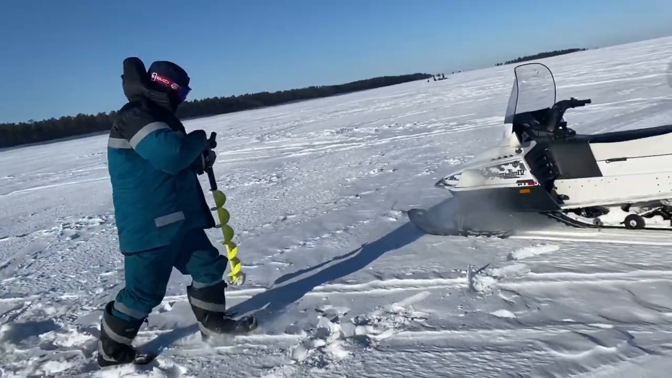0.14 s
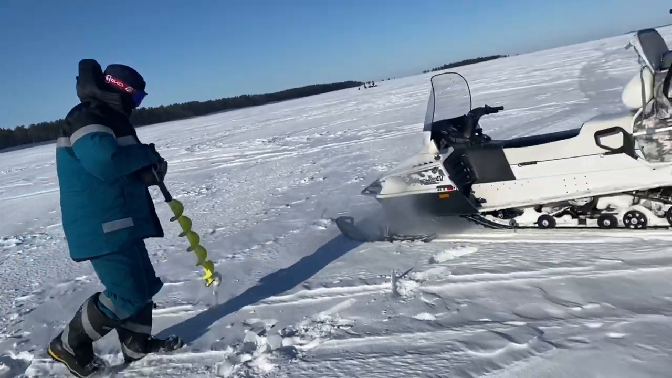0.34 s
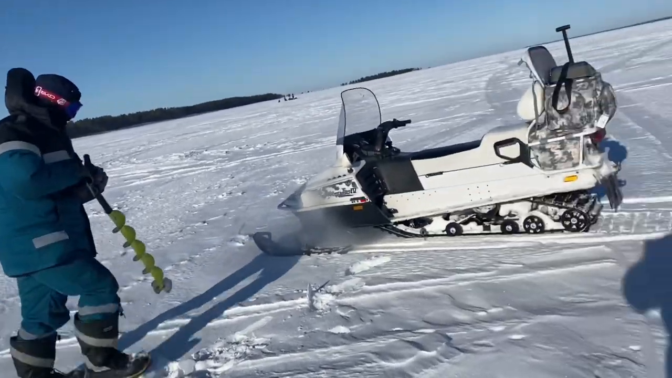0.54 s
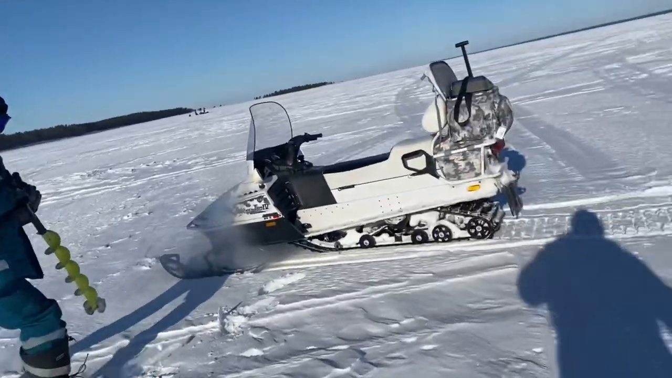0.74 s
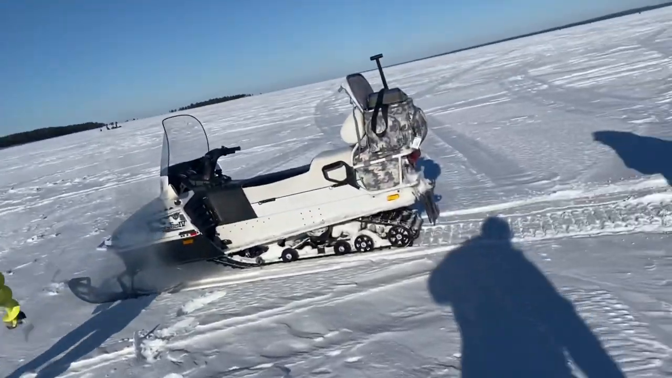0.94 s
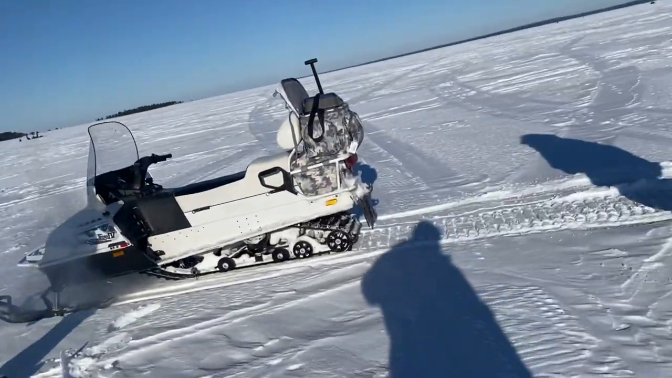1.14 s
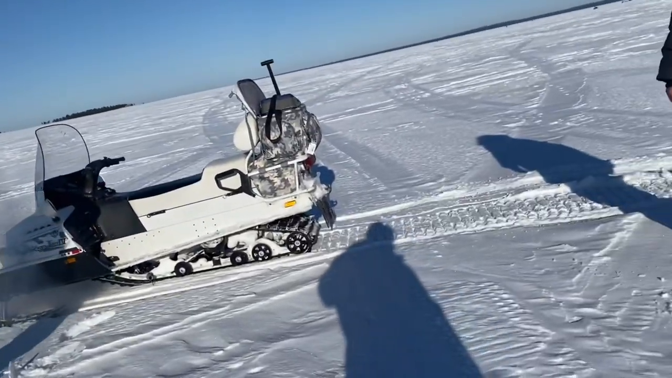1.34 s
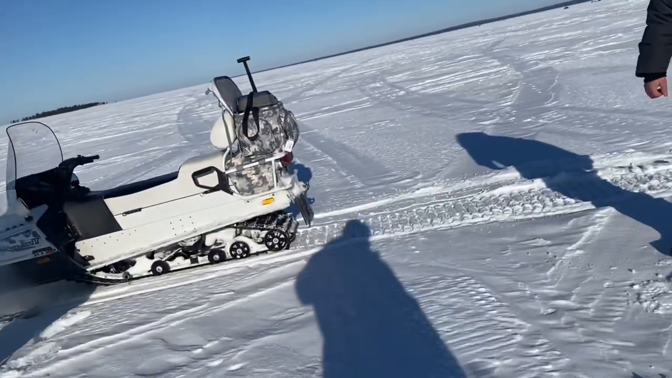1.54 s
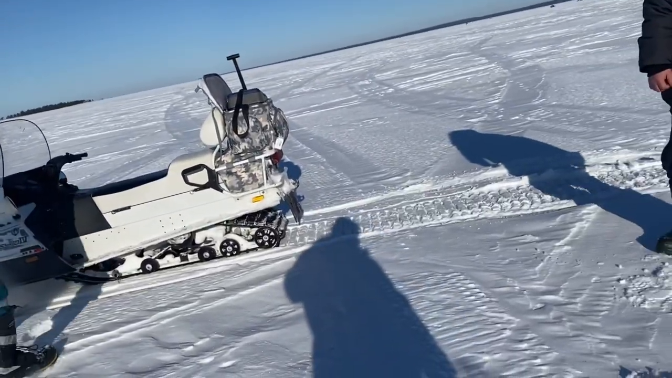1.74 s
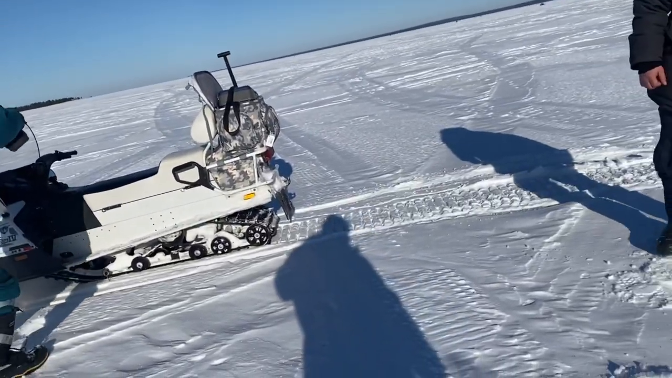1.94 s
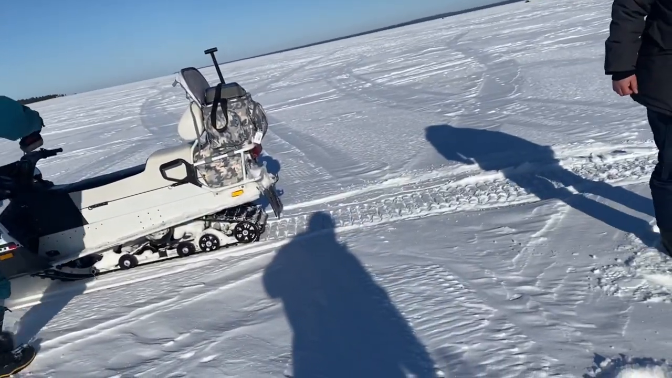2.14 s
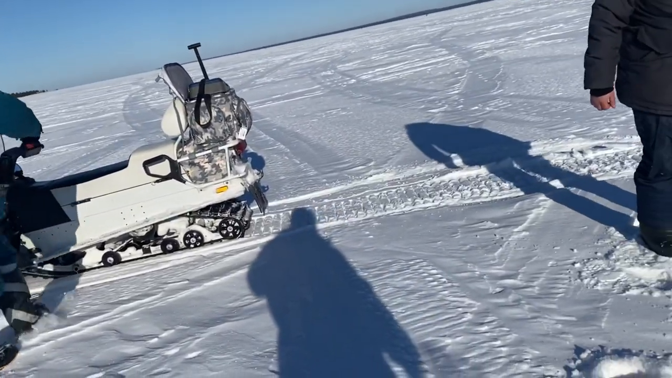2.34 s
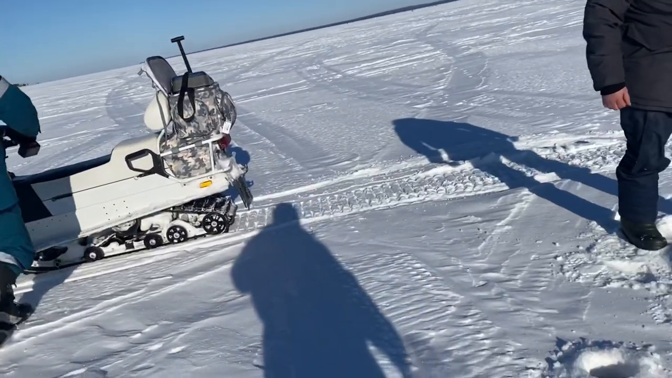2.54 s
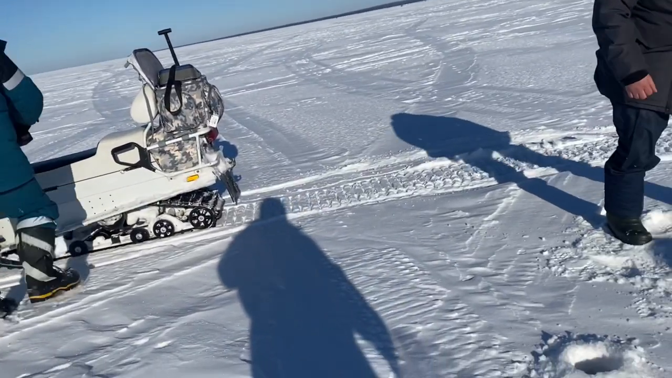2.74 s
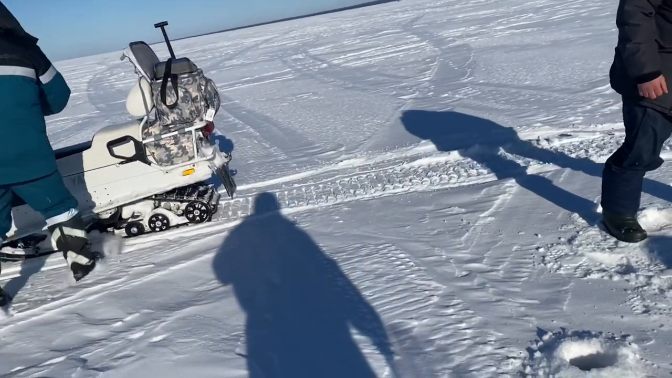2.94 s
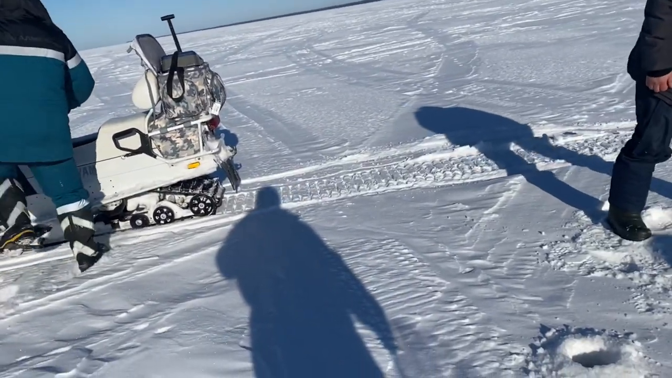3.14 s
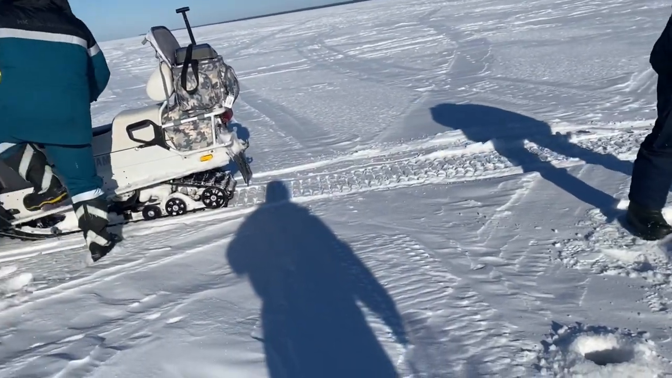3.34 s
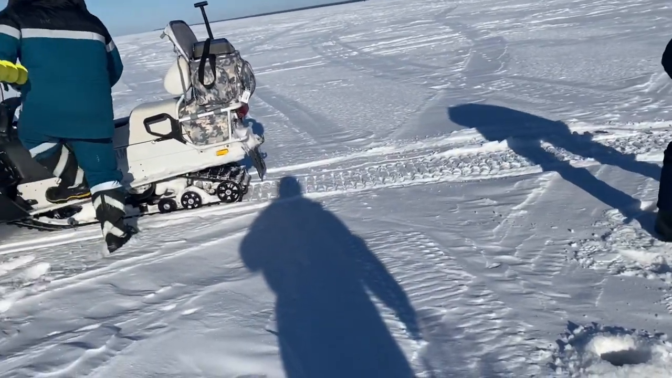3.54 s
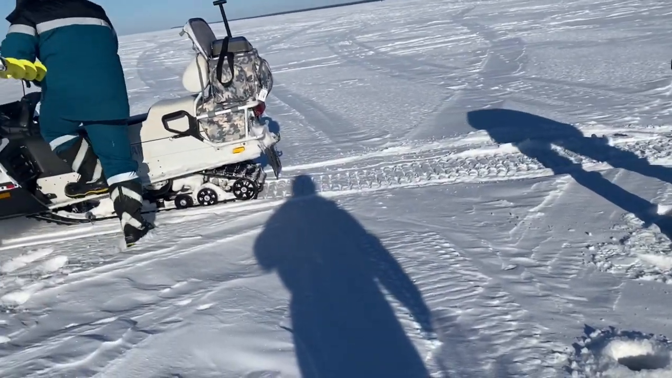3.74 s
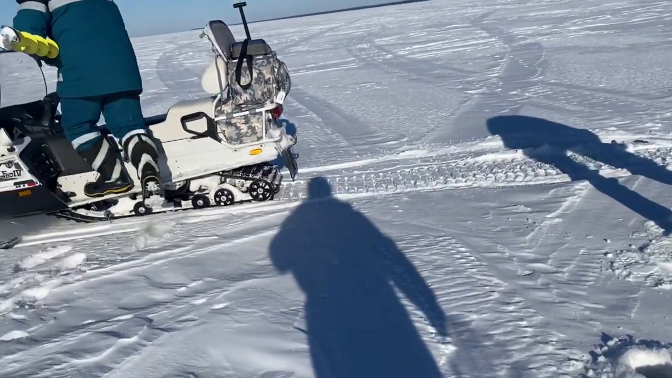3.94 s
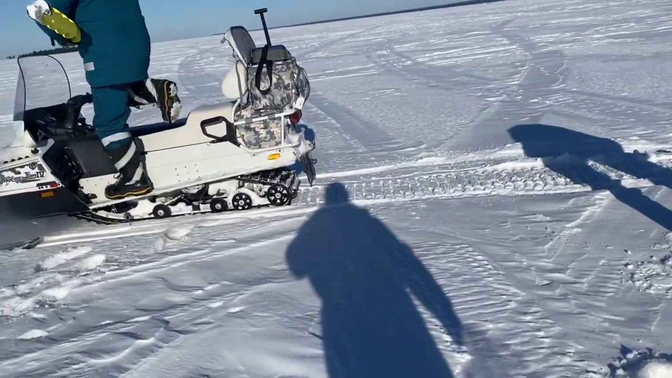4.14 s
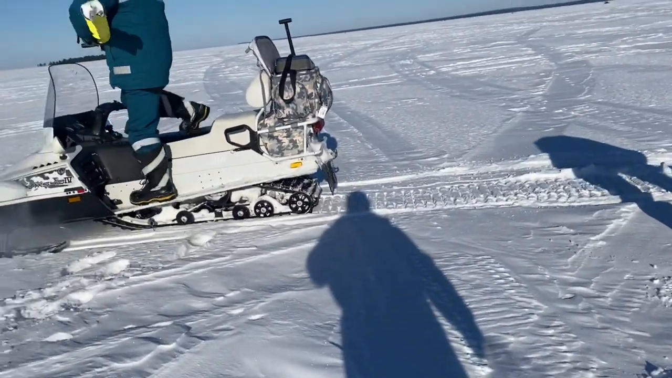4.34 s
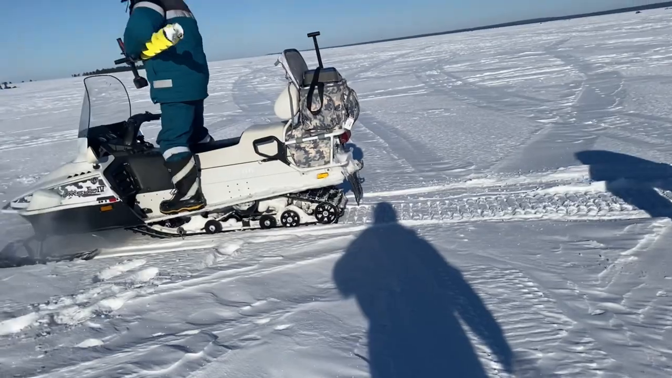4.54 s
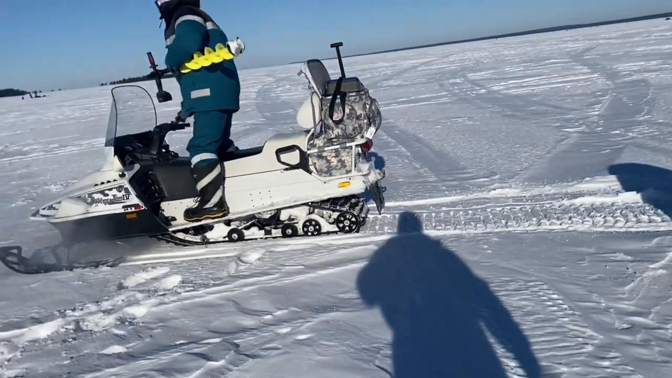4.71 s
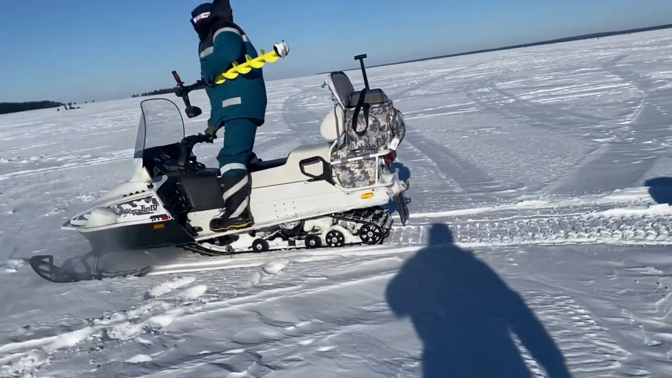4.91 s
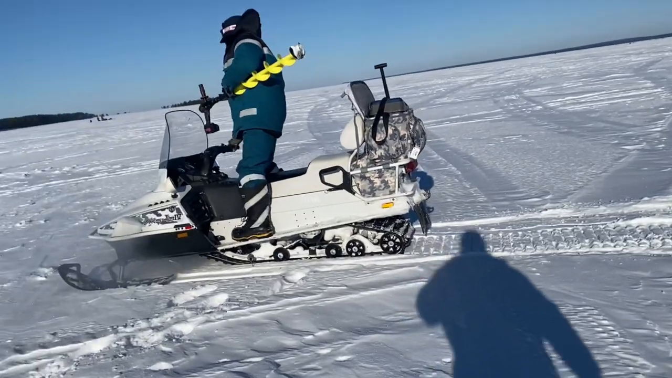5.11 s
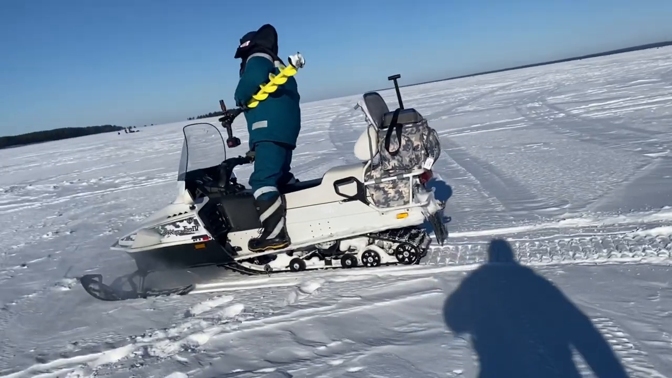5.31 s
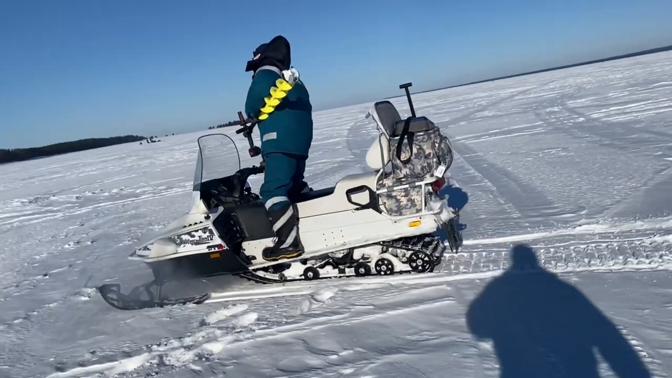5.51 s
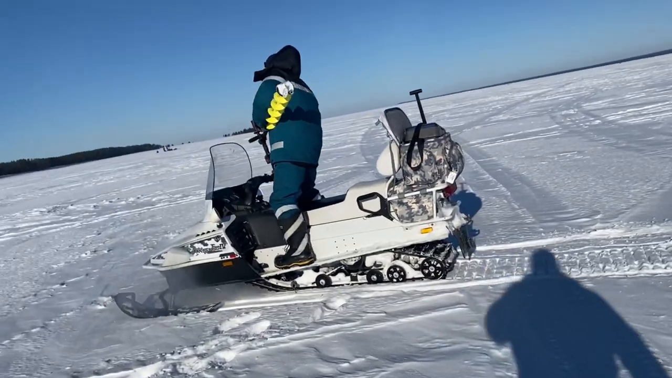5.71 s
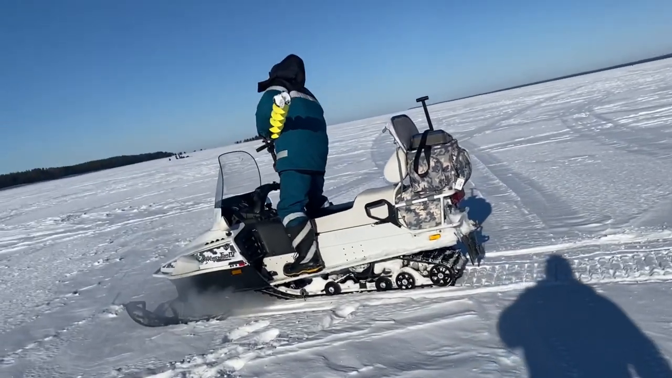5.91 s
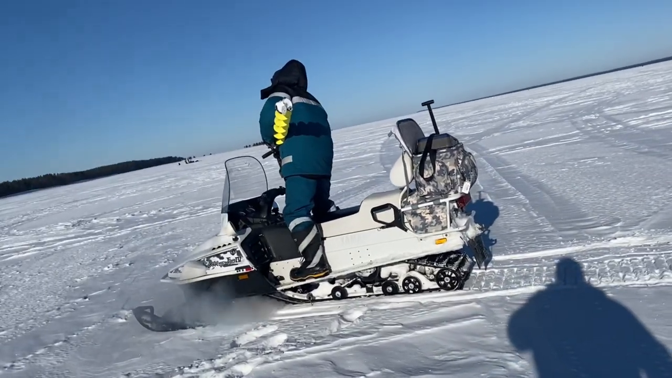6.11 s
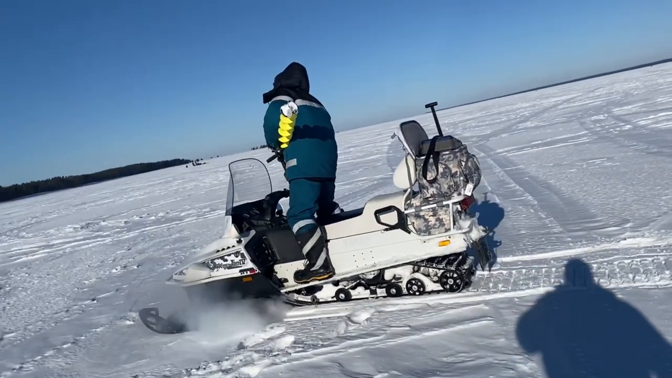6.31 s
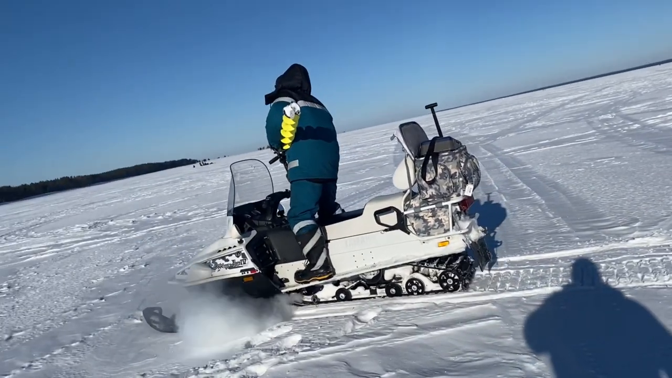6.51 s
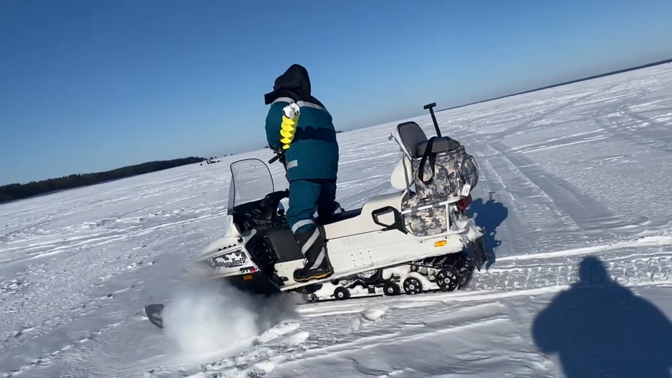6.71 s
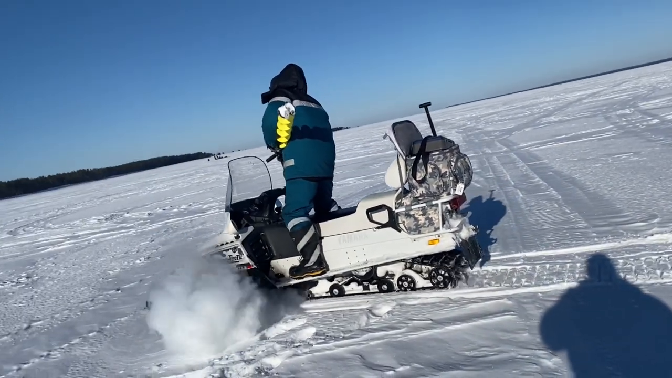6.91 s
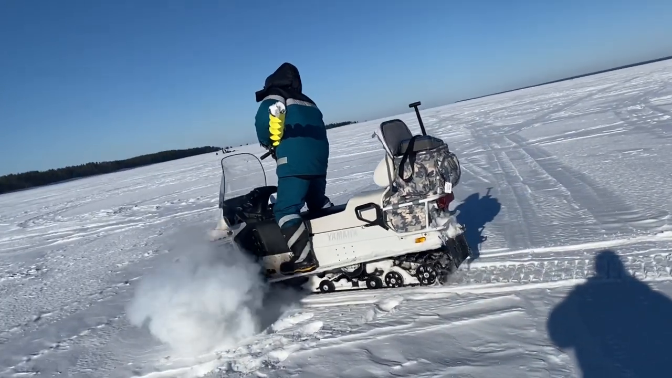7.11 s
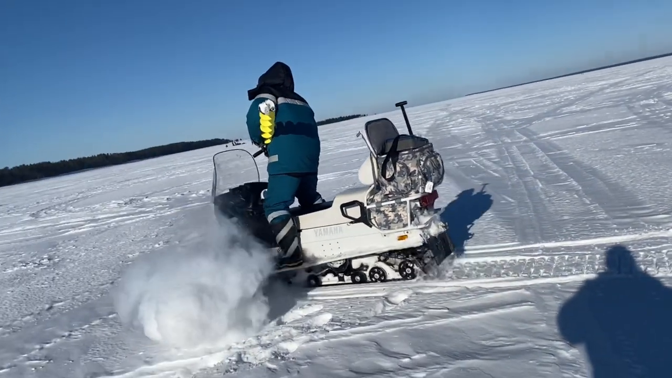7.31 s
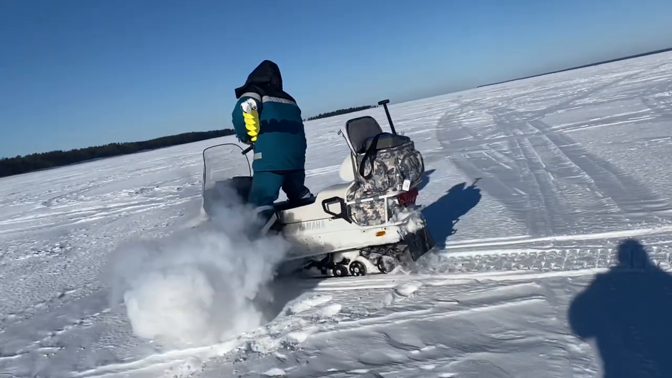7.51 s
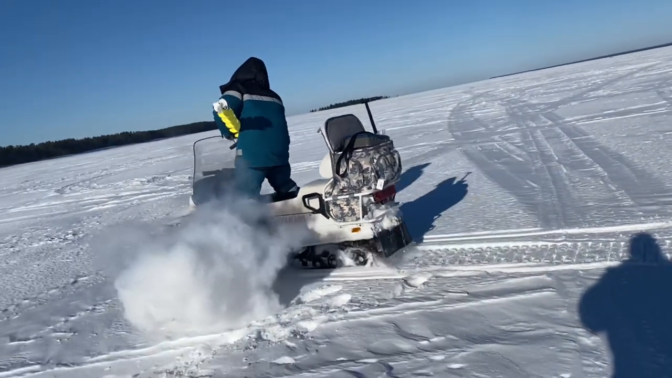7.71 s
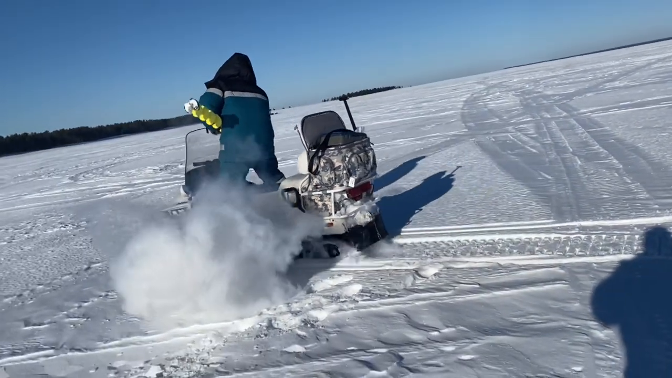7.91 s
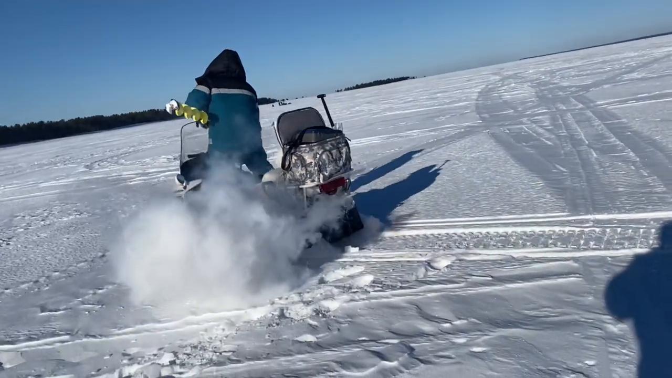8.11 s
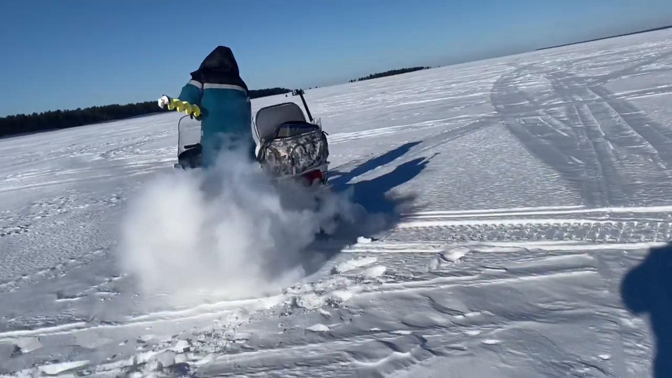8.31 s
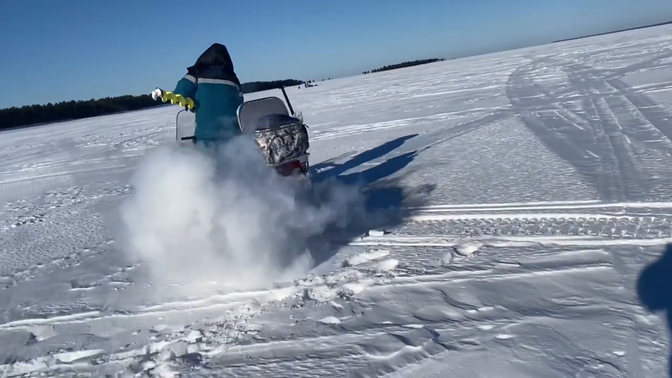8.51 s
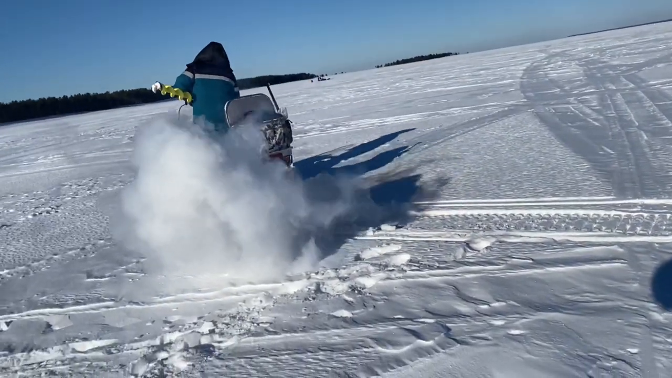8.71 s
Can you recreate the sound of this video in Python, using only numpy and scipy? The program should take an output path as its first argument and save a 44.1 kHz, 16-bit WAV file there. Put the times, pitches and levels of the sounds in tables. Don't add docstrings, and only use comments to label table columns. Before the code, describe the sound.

A two-stroke snowmobile idles close by on open snow, soft deep pops about six a second with light metal rattle and hiss. Faint boots crunch, then a cluster of dull knocks as the rider climbs aboard. Just after five seconds the throttle opens: pops merge into a loud raspy drone with hard barks, and the machine starts off with a hollow track clatter. Hand-held stereo microphone a few metres away, dry, no walls.

```python
import sys
import numpy as np
from scipy import signal
from scipy.fft import rfft, irfft, next_fast_len
from scipy.io import wavfile
from scipy.ndimage import uniform_filter1d, minimum_filter1d

SR = 44100
rng = np.random.default_rng(int(sys.argv[2]) if len(sys.argv) > 2 else 0)


def master_out(mix):
    frames = np.transpose(np.atleast_2d(mix))
    ceiling = np.clip(frames, -1, 1)
    pcm = np.round(ceiling * 32767).astype(np.int16)
    wavfile.write(sys.argv[1], SR, pcm)


def magnitude_from_level(level_db):
    exponent = np.asarray(level_db, float) / 20
    return 10 ** exponent


N = 385875

# start_s, crack_db, thump_db, hiss_puff_db
IDLE_FIRINGS = [(0.113, -14.5, -16.5, -44.5), (0.32, -16, -18, -46.5), (0.477, -16, -16.5, -41.5),
                (0.632, -17.5, -16.5, -42.5), (0.798, -14, -17.5, -43.5), (0.952, -14, -17.5, -44.5),
                (1.06, -16, -18, -44), (1.225, -17, -18, -47), (1.392, -19.5, -17.5, -46),
                (1.547, -22.5, -16, -41.5), (1.704, -20.5, -16, -46.5), (1.861, -21, -16, -44.5),
                (2.019, -18.5, -17, -44.5), (2.226, -19, -18.5, -44.5), (2.377, -18.5, -17.5, -49),
                (2.482, -19.5, -18, -55), (2.591, -21, -17.5, -50.5), (2.705, -18.5, -16.5, -49),
                (2.874, -19, -18.5, -52), (3.036, -18, -16.5, -45), (3.243, -19.5, -18, -47),
                (3.403, -16.5, -16.5, -46), (3.56, -15.5, -15.5, -45), (3.717, -16.5, -16, -43),
                (3.874, -15.5, -16.5, -43), (4.032, -15.5, -17, -42.5), (4.187, -15.5, -16, -42.5),
                (4.343, -16, -16.5, -43), (4.5, -17, -16.5, -43), (4.655, -15.5, -18.5, -45),
                (4.765, -16, -17, -43), (4.874, -18.5, -20.5, -48), (4.986, -16.5, -18.5, -43.5),
                (5.205, -17, -17, -41)]
# start_s, level_db, sharpness (0-1)
STUMBLES = [
    (0.265, -34, 0.65),
    (1.167, -31, 0.27),
    (1.318, -21, 0),
    (2.814, -43, 0.9),
    (3.188, -24, 0.2),
    (4.523, -24.5, 0.29),
    (4.852, -38.5, 1),
    (5.251, -20, 0.15),
    (5.293, -25, 0.4),
    (5.325, -34, 0.2),
]
# start_s, thump_db, hiss_puff_db
BEATS = [(5.347, -9, -39), (5.381, -9.2, -42), (5.408, -7.5, -39), (5.434, -7.0, -41),
         (5.482, -7.5, -44), (5.506, -9.6, -35), (5.528, -4.5, -43), (5.553, -15, -35.9),
         (5.581, -11, -35), (5.647, -11, -32.5), (5.707, -5, -38), (5.73, -13, -34),
         (5.777, -7.5, -32), (5.8, -5, -32), (5.845, -9.8, -42), (5.889, -6, -39),
         (5.92, -10.6, -32), (5.952, -14, -44), (6.003, -13, -37), (6.053, -9, -36),
         (6.101, -13, -49), (6.14, -15, -51), (6.179, -6.5, -40), (6.236, -8, -35),
         (6.293, -8, -42), (6.342, -10.7, -37), (6.389, -9.4, -35), (6.428, -7, -39),
         (6.467, -12, -33), (6.497, -6, -43), (6.546, -5.5, -40), (6.597, -9, -45),
         (6.646, -2.5, -40), (6.705, -13, -34), (6.736, -12.1, -33), (6.764, -6, -38),
         (6.803, -8, -43), (6.862, -13, -32), (6.911, -8, -37), (6.959, -7.4, -32.3),
         (7.015, -6, -29), (7.07, -7, -32.9), (7.12, -19, -35.4), (7.144, -8, -31),
                (7.171, -18, -35), (7.208, -15.2, -32), (7.23, -14.4, -40), (7.254, -7, -29),
                (7.281, -13, -40), (7.337, -10.5, -32.1), (7.396, -12, -40), (7.42, -10.6, -31.3),
                (7.497, -8, -37), (7.54, -9, -31), (7.585, -13, -31), (7.639, -10, -33.2),
                (7.688, -12, -31.5), (7.715, -10, -32), (7.757, -10, -37), (7.811, -11.5, -32),
                (7.855, -12.9, -29.5), (7.889, -19, -32), (7.916, -15, -31), (7.99, -19, -32),
                (8.02, -11, -34), (8.064, -12.5, -31), (8.09, -10, -37), (8.137, -17, -38),
                (8.176, -14, -36), (8.211, -14, -36), (8.237, -15.2, -35.6), (8.309, -21, -32),
                (8.339, -17, -31), (8.46, -11, -32.5), (8.519, -19, -31.5), (8.562, -8.5, -29.5),
                (8.6, -11, -31), (8.654, -15, -42), (8.69, -17, -31.5), (8.721, -10.5, -39)]
# time_s, speed_turns_per_s
CRANK_SPEED = [(5.2, 20.1), (5.24, 22.6), (5.41, 36.5), (5.5, 43.4), (5.59, 45.1), (5.75, 42.8),
               (5.96, 48.2), (6.09, 51.7), (6.27, 52.3), (6.62, 50.1), (6.94, 51.9), (7.08, 54.4),
               (7.53, 54.3), (7.85, 56.3), (8.11, 57.8), (8.63, 58.8), (8.75, 56.5)]
# time_s, loudness_db, brightness_db
ENGINE = [(0, -35, -16), (.55, -35, -15), (.9, -34.5, -22), (1.6, -36.5, -20), (2.3, -39, -7.5),
          (2.7, -42.5, -13), (3.0, -39, -17), (3.75, -36.5, -15), (4.8, -34.5, -18), (5.15, -33.5, -30),
          (5.35, -28, -4.5), (5.55, -25.5, -6.5), (5.75, -28.5, -13), (6.05, -26, -0.5), (6.9, -24.5, -5),
          (7.75, -26, -6), (8.3, -27.5, -8.5), (8.75, -30.5, -11)]
# time_s, share of port openings that burn (0-1), burn_db, pumping_db
LOAD = [(0, 0.39, -40, -17), (4.7, 0.35, -34, -18), (5.25, 0.13, -40, -20), (5.4, 0.15, -33, -12.5),
        (5.9, 0.56, -22, -8.5), (6.15, 1, -27, -2), (6.5, 0.28, -50, -13.5), (6.9, 0.52, -35, -5.5),
        (7.2, 0.08, -16, -20.5), (7.5, 0.04, 5, -18), (8.0, 0.16, 15, -18), (8.75, 0.25, -19, -14.5)]
# start_s, strength of the dip (before smoothing)
LULLS = [
    (0.2, 0.95),
    (0.4, 1.0),
    (2.64, 0.6),
    (2.73, 0.99),
    (2.93, 0.88),
    (3.09, 0.9),
    (4.9, 1.1),
    (5.05, 0.96),
    (5.13, 1.0),
]
# pitch_hz, width_hz, level_db
SILENCER = [(102.8, 69.3, 2), (47, 74, -1.5), (212, 118, -10.5)]
# pitch_hz, width_hz, level_db
CHAMBER = [(78.8, 68.5, -18), (364, 90, -48)]
# pitch_hz, width_hz, level_db
TAILPIPE = [(382, 69, -16), (302, 62, -26), (457, 60, -27)]
# pitch_hz, width_hz, level_db
COWL = [(563, 50, -12), (858, 250, 5), (1230, 388, 9.5), (1526, 510, 0), (310, 203, 6)]
# pitch_hz, width_hz, level_db
FINS = [(2120, 182, 2.5), (2736, 315, 4), (3480, 550, -1.5), (1674, 383, 5)]
# pitch_hz, width_hz, level_db
CLUTCH_COVER = [(1434, 220, 6.5), (1990, 127, -1), (810, 190, -13), (2900, 470, -4.5)]
# pitch_hz, level_db (per Hz)
HISS = [(2060, -86), (3500, -1), (5860, -3), (6960, -2.5), (8860, 0.5), (10700, -4), (13500, -9),
        (16000, -5.5)]
# start_s, level_db
STEPS = [
    (0.28, -82),
    (0.55, -68),
    (1.18, -47),
    (1.68, -42),
    (2.2, -45.5),
    (2.8, -46),
    (3.5, -50),
    (4.28, -53),
]
# start_s, peak_db
SPITS = [(0.4589, -41), (0.5561, -35), (1.1498, -33), (1.8038, -36), (2.3176, -31.5), (2.7995, -42),
         (3.019, -44), (3.1857, -36), (3.6641, -31), (3.9729, -39), (4.3191, -29), (4.6389, -42),
         (4.8424, -34)]
# start_s, peak_db, pitch_hz, bright_db
KNOCKS = [(0.302, -24, 1260, -33), (0.406, -36, 584, -38), (0.782, -23, 1240, -34), (0.955, -37, 457, -32),
          (1.378, -26.5, 1240, -25), (1.763, -26, 1180, -33), (2.21, -27.5, 1250, -23),
          (2.862, -33, 557, -23), (2.992, -53, 1160, -24), (3.357, -39, 600, -40), (3.505, -17, 466, -33),
          (3.545, -24, 646, -26), (3.633, -20.5, 630, -30), (3.705, -18.5, 666, -27),
          (3.744, -22, 720, -32), (3.771, -20.5, 490, -32), (3.849, -22.5, 644, -28),
          (4.279, -23.5, 616, -25.5), (4.3, -28.5, 452, -30), (4.485, -35, 1210, -23),
          (5.579, -34, 624, -24), (5.646, -22, 554, -22), (5.707, -14.5, 1400, -28),
          (8.058, -19.5, 1180, -20), (8.403, -23, 670, -18)]
# multiple of crank speed, standing_db, moving_db
CRANK_TONES = [(1, -1, -3), (2, 3, -14), (3, -17, -6), (4, -3, -10), (5, -8, -11), (6, -9, -8),
               (7, -16, -14), (8, -7, -11), (9, -18, -18), (10, -17, -13), (11, -9, -15), (12, -12, -14),
               (14, -19, -18), (15, -19, -18), (16, -18, -20)]
# time_s, tones_db, moving off (0-1), howl_db of the pipe on the sixth tone
DRONE = [(0, -79, 0, 0), (5.22, -42, 0.2, 9), (5.33, -17.5, 0, -14), (5.45, -18, 0.1, -1.5),
         (5.6, -27.5, 0.9, 8), (5.75, -22.5, 0, 3), (6, -20.5, 0.15, -1.5), (6.5, -23, 0.3, 0),
         (7.0, -22.5, 0.2, -9), (7.3, -23.5, 0.85, -4), (7.9, -26, 0.9, -4), (8.2, -24, 1, 5.5),
         (8.45, -25.5, 1, 7), (8.75, -28, 1, 4.5)]
# start_s, peak_db, tunnel_db (share that rings the tunnel)
BARKS = [(5.333, -24, -7), (5.382, -15, -5), (5.428, -19, -18), (5.527, -6, -25), (5.579, -17, -16),
         (5.641, -10, -5), (5.707, -15, -2), (5.773, -11, -8), (5.799, -9, -15), (5.842, -6.5, -15),
         (5.887, -9, -21), (5.958, -14, -19), (6.09, -11, -20), (6.13, -8, -34), (6.191, -13, -13),
         (6.322, -16, -18), (6.385, -24, -19), (6.419, -5.5, -16), (6.497, -12, -25), (6.536, -7, -27),
         (6.594, -9, -28), (6.637, -8.5, -27), (6.697, -9, -26), (6.736, -7, -27), (6.795, -12, -24),
         (6.896, -26, -15), (6.972, -6.5, -6), (7.062, -14, -4), (7.141, -14, -7), (7.177, -14, 1),
         (7.212, -16, -16), (7.251, -17, -17), (7.285, -14, -13), (7.33, -8, -10), (7.376, -6, -16),
         (7.409, -18, -7), (7.479, -14, -9), (7.504, -11, -6), (7.536, -15, -3), (7.575, -10, -19),
         (7.631, -7.5, -7), (7.667, -9, -14), (7.699, -20, -4), (7.725, -13, -13), (7.753, -21, 6),
         (7.815, -12, -5), (7.848, -12, -11), (7.888, -13, -14), (7.966, -13, -9), (8.019, -18, -9),
         (8.059, -18, -11), (8.129, -18, -7), (8.18, -16, 3.5), (8.293, -15, -12), (8.372, -12, -10),
         (8.402, -14, -5), (8.467, -21, 3), (8.555, -17, -6), (8.633, -14, -3), (8.714, -17, 0)]
# start_s, peak_db
TUNNEL_RINGS = [(7.252, -22), (7.332, -22), (7.417, -22), (7.465, -30.5), (7.537, -28.5), (7.582, -23),
                (7.638, -36), (7.699, -24), (7.755, -19.5), (7.81, -23), (7.913, -24), (7.967, -20.5),
                (8.018, -23), (8.064, -28), (8.124, -24), (8.178, -29), (8.245, -26), (8.294, -28),
                (8.336, -26), (8.401, -34), (8.509, -30), (8.606, -35)]
# pitch_hz, width_hz, level_db
TUNNEL = [(822, 70, 0), (600, 70, -10)]
# pitch_hz, width_hz, level_db
FRAME = [(1180, 410, 2.5), (1520, 330, 2.5), (2160, 390, -3), (2940, 1150, 1), (3930, 1250, -3.5)]
# time_s, aim (0-1)
FACING = [(0, 0.92), (.75, 0.96), (1.05, 0), (4.45, 0), (5.2, 0.89), (8.75, 0.88)]
# pitch_hz, lead (half turns)
LEAD_ASIDE = [(0, 0), (520, .25), (900, .35), (1200, .15), (1550, .4), (2150, 1), (2700, 2), (6400, 2)]
# pitch_hz, lead (half turns)
LEAD_AHEAD = [(0, 0), (1900, 0), (2600, .38), (3500, .22), (5000, .3), (5750, .72), (6400, 0)]
# pitch_hz, lead (half turns)
LEAD_HIGH = [(7500, 0), (8500, -1), (9500, -1), (10500, -2), (11700, -2), (12600, -3), (13600, -3),
             (14800, -4)]
# pitch_hz, left_minus_right_db
LEFT_LOUDER = [(60, 1.5), (270, 1), (480, 2.5), (950, 4), (2000, 1), (3500, 3.5), (5500, 3), (6400, 0)]
# pitch_hz, level_db
SCATTER = [(60, -24.5), (500, -16.5), (1800, -10.5), (4200, -6.5), (6300, -13), (6800, -28), (8000, -27)]


def columns(rows):
    s, *rest = np.transpose(rows)
    return [np.interp(np.arange(N) / SR, s, c) for c in rest]


def rms_one(x):
    return x / np.sqrt(np.mean(x ** 2) + 1e-20)


def even_out(x, floor):
    return x / np.sqrt(uniform_filter1d(x ** 2, SR // 4) + floor)


def clicks(times, sizes):
    out = np.full(N, 1e-18)
    at = np.clip((np.asarray(times) * SR).astype(int), 0, N - 1)
    np.add.at(out, at, sizes)
    return out


def resonances(x, modes, count=1):
    out = 0
    for k, (hz, width_hz, db) in enumerate(modes):
        r = np.exp(-np.pi * width_hz / SR)
        feedback = [1, -2 * r * np.cos(2 * np.pi * hz / SR), r * r]
        y = x
        for _ in range(count):
            y = signal.lfilter([(1 - r * r) / 2, 0, (r * r - 1) / 2], feedback, y)
        out = out + magnitude_from_level(db) * y * (-1) ** k * SR / width_hz
    return out


def swell(x, rise_s, fall_s):
    a, b = np.exp(-2 / (rise_s * SR)), np.exp(-1 / (fall_s * SR))
    fading = signal.lfilter([1], [1, -b], x)
    return signal.lfilter([(1 - a) ** 2], [1, -2 * a, a * a], fading)


def on_log_hz(points, hz):
    table_hz, value = np.transpose(points)
    return np.interp(np.log(hz + 1), np.log(table_hz), value)


def slow_waver(steps_per_s, knot_values):
    return np.interp(np.arange(N), np.arange(0, N + SR // steps_per_s, SR // steps_per_s), knot_values)


def knot_count(steps_per_s):
    return len(np.arange(0, N + SR // steps_per_s, SR // steps_per_s))


def crank_angle(fired):
    idle_turns_per_s = 19.2
    turns = np.cumsum(np.r_[0, np.round(np.diff(fired) * idle_turns_per_s)])
    t = np.arange(N) / SR
    angle = np.interp(t, np.r_[fired[0] - 1, fired], np.r_[-idle_turns_per_s, turns])
    part = np.interp(t, fired, np.arange(len(fired))) % 1
    angle += .25 * part * (1 - part)
    throttle_speed = columns(CRANK_SPEED)[0] * (t > fired[-1])
    return angle + np.cumsum(throttle_speed) / SR


def port_openings(angle):
    return np.flatnonzero(np.diff(np.floor(2 * angle), prepend=-9) > 0) / SR


def loaded_firings(ports):
    s, db, puff_db = np.transpose(BEATS)
    nearest = np.abs(ports[:-1, None] - s - .003).argmin(axis=0)
    return nearest, db - 3.0, puff_db + 1.0


def exhaust(ports, idle, loaded):
    strength, burn_luck, delay = rng.random((len(ports), 3)).T
    other = np.arange(len(ports)) % 2
    burn_share, burn_db, pumping_db = columns(LOAD)
    at = (ports * SR).astype(int)
    fire_s, crack_db, fire_db, _ = idle

    since_s = ports - np.r_[-1, fire_s][np.searchsorted(fire_s, ports + .001)]
    push_db = -5.0 * np.exp(-since_s / 0.012) - 0.57 * other + 4.4 * (strength - .5)
    pumped = clicks(ports + 0.00089 + 0.0055 * delay, magnitude_from_level(push_db))
    pumping = even_out(resonances(pumped, CHAMBER, count=3), 1e-9)
    pumping = magnitude_from_level(pumping_db - 18.0 * burn_share) * pumping

    small_burn_db = burn_db[at] - 3.8 * other + 36.0 * (delay - 9.5)
    burns = clicks(ports, (burn_luck < burn_share[at]) * magnitude_from_level(small_burn_db))
    nearest, beat_db, _ = loaded
    beat_db = beat_db - 3.5 * (1 - np.interp(ports[nearest], *np.transpose(DRONE)[[0, 2]]))
    burns += clicks(ports[nearest], magnitude_from_level(beat_db - 8.0))
    burns += clicks(ports[nearest + 1], magnitude_from_level(beat_db - 21.5))

    odd_s, odd_db, sharp = np.transpose(STUMBLES)
    thumps = burns + clicks(fire_s + 0.0014, magnitude_from_level(fire_db - 2.0)) + clicks(odd_s, magnitude_from_level(odd_db + 2.0))
    deep = resonances(thumps, SILENCER[:2], count=3)

    crisp = burns + clicks(odd_s, sharp * magnitude_from_level(odd_db + 14.5))
    tailpipe_lag_s, tailpipe_spread_db = 0.003, 5
    late = np.roll(crisp, int(tailpipe_lag_s * SR))
    late = late * magnitude_from_level(tailpipe_spread_db * rng.uniform(-1.6, 1, N))
    crisp = crisp + clicks(fire_s + 0.0016, magnitude_from_level(crack_db - 3.0))
    late = late + clicks(fire_s + 0.00427, magnitude_from_level(crack_db - 3.0))
    edge = resonances(crisp, SILENCER[2:], count=2) - resonances(late, TAILPIPE, count=3)
    return pumping + deep - magnitude_from_level(5.5 - 0.88 * burn_share) * edge


def gas_flow(ports, idle, loaded):
    flow = magnitude_from_level(2 * slow_waver(16, rng.standard_normal(knot_count(16))))
    flow *= 1 - np.clip(swell(clicks(ports[loaded[0]] - 0.03, 1.2), 0.0021, 0.01), 0, .9)
    flow *= 1 - np.clip(swell(clicks(idle[0] - 0.05, 0.28), 0.015, 0.01), 0, .9)
    flow *= 1 - np.clip(swell(clicks(*np.transpose(LULLS)), 0.015, 0.027), 0, .85)
    return flow


def gas_and_metal(ports, idle, loaded, rattle_db, rasp_db, hiss_db):
    white = rng.standard_normal((3, 2, N))
    flow = gas_flow(ports, idle, loaded)
    beat = swell(clicks(ports, .5 + rng.random(len(ports))), 0.0025, 0.0045)
    tick_late, tick_hard = rng.uniform(-1, 1, (len(ports), 2)).T
    white[:2] += clicks(ports + 0.004 * tick_late, magnitude_from_level(18 + 6 * tick_hard))
    fire_s, _, _, puff_db = idle
    nearest, _, burst_db = loaded
    puff = swell(clicks(fire_s - .012, magnitude_from_level(puff_db + 10.5)), 0.011, 0.0062)
    burst = swell(clicks(ports[nearest] - .010, magnitude_from_level(burst_db - 7.5)), 0.005, 0.009)

    rattle_level = magnitude_from_level(rattle_db) * (0.61 + 0.24 * beat) + 1.6 * puff + 2.9 * burst
    rattle = rms_one(resonances(white[0], COWL)) * rattle_level
    rasp_level = magnitude_from_level(rasp_db) * flow ** 0.58 * (0.77 + 0.59 * beat) + 0.57 * puff + 1.9 * burst
    rasp = rms_one(resonances(white[1], FINS)) * rasp_level

    hz = np.arange(N // 2 + 1) * SR / N
    air = rms_one(irfft(rfft(white[2]) * magnitude_from_level(on_log_hz(HISS, hz)), N))
    jet = rms_one(np.diff(air, prepend=0))
    hiss = air * (magnitude_from_level(hiss_db) * flow * (0.65 + 0.78 * beat) + 2.13 * burst)
    return rattle + rasp + hiss + jet * (0.42 * burst + 1.77 * puff)


def piston_slap(ports, loud_db):
    late, hard = rng.uniform(-1.12, 1, (len(ports), 2)).T
    slaps = clicks(ports + 0.00114 * late, magnitude_from_level(7 * hard))
    rung = even_out(resonances(slaps, CLUTCH_COVER, count=2), 1e-12)
    gained = uniform_filter1d(np.gradient(columns(CRANK_SPEED)[0]) * SR, SR // 4)
    return magnitude_from_level(loud_db - 8.5 + 0.2966 * gained) * np.clip(columns(LOAD)[0], 0, 1) * rung


def band_noise(order, band_hz, noise):
    return signal.sosfilt(signal.butter(order, band_hz, "band", fs=SR, output="sos"), noise)


def steps():
    s, db = np.transpose(STEPS)
    spit_s, spit_db = np.transpose(SPITS)
    grains_per_s = 2800
    grains = (rng.random(N) < grains_per_s / SR) * rng.standard_normal(N) + 1e-9
    crust = band_noise(1, [2500.0, 15000.0], grains)
    crush = swell(clicks(s, magnitude_from_level(db + 4.5)), rise_s=0.018, fall_s=0.041)
    spits = swell(clicks(spit_s, magnitude_from_level(spit_db - 10.5)), rise_s=0.0022, fall_s=0.022)
    return rms_one(crust) * (crush + spits)


def knocks():
    slap = band_noise(2, [300, 1070], rng.standard_normal(N))
    grit = band_noise(2, [2500, 9400], rng.standard_normal(N))
    out, t = np.zeros(N), np.arange(SR // 12) / SR
    for s, db, hz, bright_db in KNOCKS:
        at = int(s * SR)
        here = slice(at, at + len(t))
        note = np.sin(2 * np.pi * hz * t) * np.exp(-t / 0.0044)
        crunch = 1.53 * slap[here] + magnitude_from_level(bright_db + 14.0) * grit[here]
        touch = 1.8 * note + 1.42 * crunch * np.exp(-t / 0.019)
        out[here] += magnitude_from_level(db - 4.0) * touch * (1 - np.exp(-t / 0.00027))
    return out


def tones(angle):
    level_db, moving, howl_db = columns(DRONE)
    clean_burn_turns_per_s = 50
    unclean = np.clip((clean_burn_turns_per_s - columns(CRANK_SPEED)[0]) / 3, 0, 1)
    wavers = rng.standard_normal((len(CRANK_TONES), knot_count(14)))
    out = 0
    for (k, standing_db, moving_db), waver in zip(CRANK_TONES, wavers):
        db = standing_db + (moving_db - standing_db) * np.clip(moving, 0, 1)
        db = db + (k == 6) * howl_db
        db = db + (1.5 + .12 * k) * slow_waver(14, waver)
        db -= 5 * (k in (4, 8, 11, 12, 16)) * unclean
        phase_turns = round(k) * angle - .25 + (k > 2) * waver[0]
        out = out + magnitude_from_level(db) * np.sin(2 * np.pi * phase_turns)
    return magnitude_from_level(level_db) * out


def barks():
    s, db, tunnel_db = np.transpose(BARKS)
    ring_s, ring_db = np.transpose(TUNNEL_RINGS)
    blast = swell(clicks(s, magnitude_from_level(db - 10)), rise_s=0.0021, fall_s=0.0069)
    frame = rms_one(resonances(rng.standard_normal(N), FRAME)) * blast
    struck = clicks(s, magnitude_from_level(db + tunnel_db - 14)) + clicks(ring_s, magnitude_from_level(ring_db - 5))
    return frame + resonances(struck, TUNNEL, count=2)


def ports_pair(direct, diffuse, lead):
    size = next_fast_len(N + 4096)
    hz = np.arange(size // 2 + 1) * SR / size
    half_turns = np.interp(hz, *np.transpose(lead)) + np.interp(hz, *np.transpose(LEAD_HIGH))
    gain = magnitude_from_level(on_log_hz(LEFT_LOUDER, hz) / 2)
    mid = rfft(direct, size)
    side = rfft(diffuse, size) * magnitude_from_level(on_log_hz(SCATTER, hz))
    left = (mid + side) * gain * np.exp(1j * np.pi * half_turns)
    right = (mid - side) / gain
    return irfft(np.array([left, right]), size)[:, :N]


def scene():
    loud_db, bright_db = columns(ENGINE)
    facing = columns(FACING)[0]
    idle = np.transpose(IDLE_FIRINGS)
    angle = crank_angle(idle[0])
    ports = port_openings(angle)
    loaded = loaded_firings(ports)

    thump = exhaust(ports, idle, loaded)
    rattle_db = 2.5 + loud_db
    rasp_db = -3.0 + 2 * facing + loud_db + 0.78 * bright_db
    hiss_db = -3.5 + loud_db.mean() + 0.68 * (loud_db - loud_db.mean()) + 0.67 * bright_db
    noise, scattered = gas_and_metal(ports, idle, loaded, rattle_db, rasp_db, hiss_db)
    pipe_lag_s = 0.0105
    drone = tones(np.roll(angle, int(pipe_lag_s * SR)))
    direct = thump + noise + piston_slap(ports, loud_db) + steps() + knocks() + drone + barks()
    diffuse = scattered + np.roll(thump, 600)

    aimed = np.clip(facing, 0, 1)
    aside = ports_pair(direct * (1 - aimed), diffuse * (1 - aimed), LEAD_ASIDE)
    ahead = ports_pair(direct * aimed, diffuse * aimed, LEAD_AHEAD)
    return aside + ahead


def top_cut(x):
    return signal.sosfilt(signal.butter(12, 17060, fs=SR, output="sos"), x)


def record(dry):
    cut = signal.sosfilt(signal.butter(2, 45, "high", fs=SR, output="sos"), dry)
    cut = signal.sosfilt(signal.ellip(10, .5, 70, 15850, fs=SR, output="sos"), cut)
    room_left = np.minimum(1, .78 / (np.abs(cut).max(axis=0) + 1e-9))
    gain = uniform_filter1d(minimum_filter1d(room_left, size=1200), size=600)
    return top_cut(cut * gain)


dry = scene()
out = record(dry)
master_out(out)
```